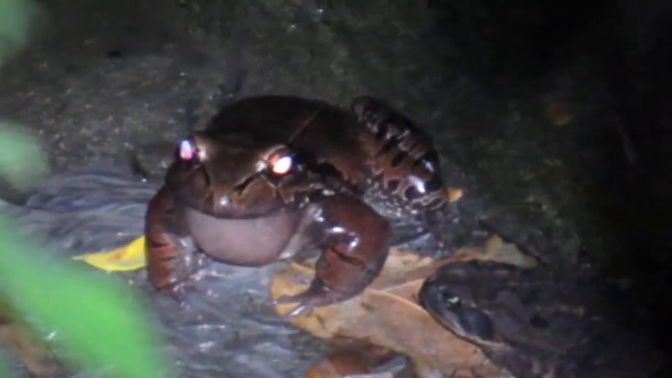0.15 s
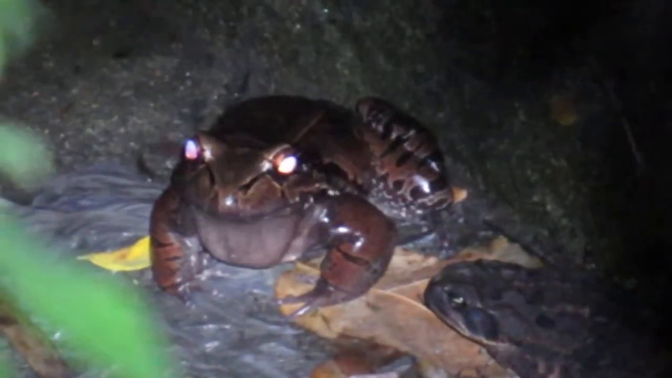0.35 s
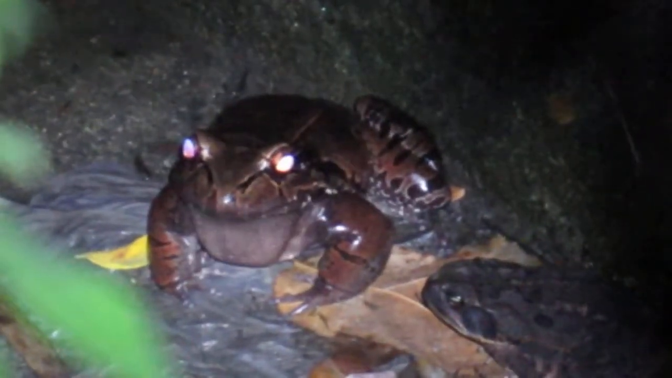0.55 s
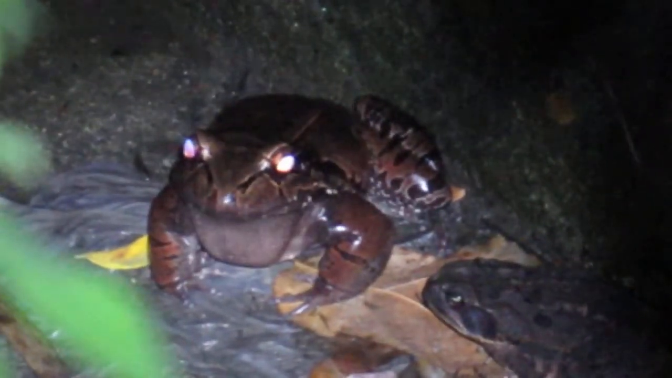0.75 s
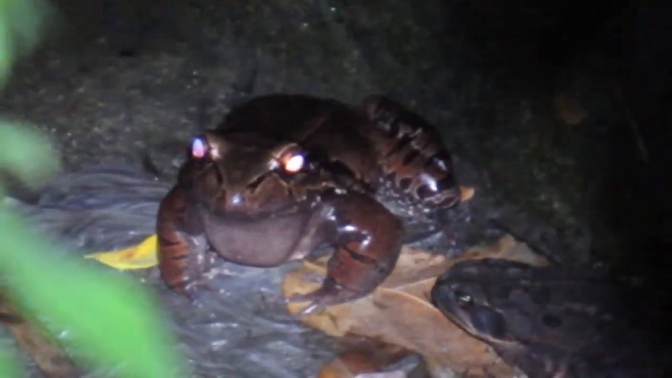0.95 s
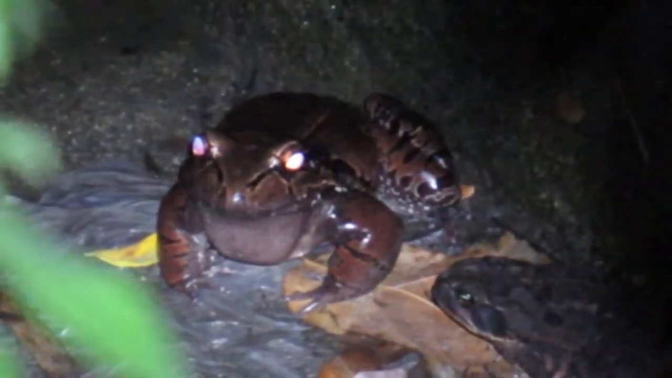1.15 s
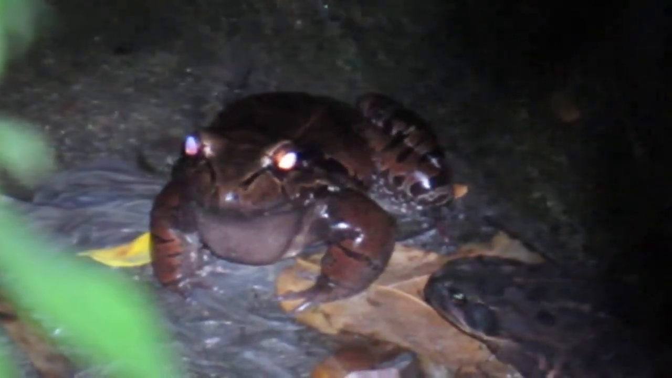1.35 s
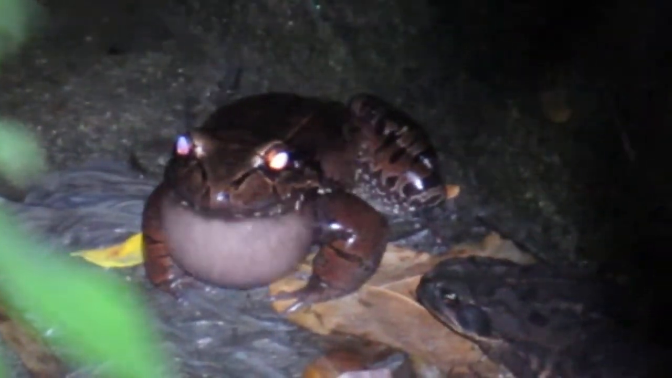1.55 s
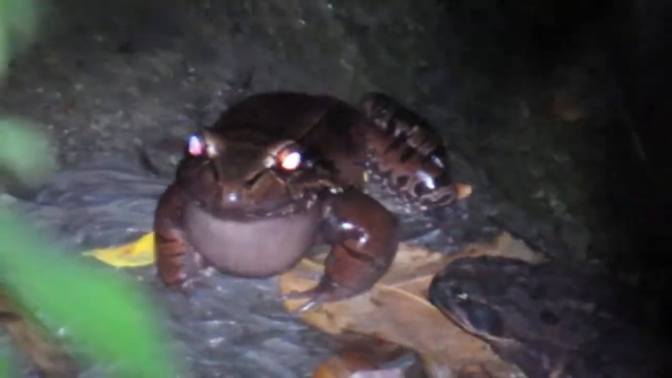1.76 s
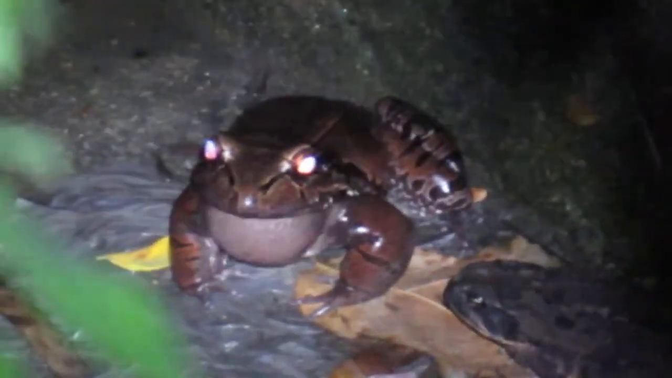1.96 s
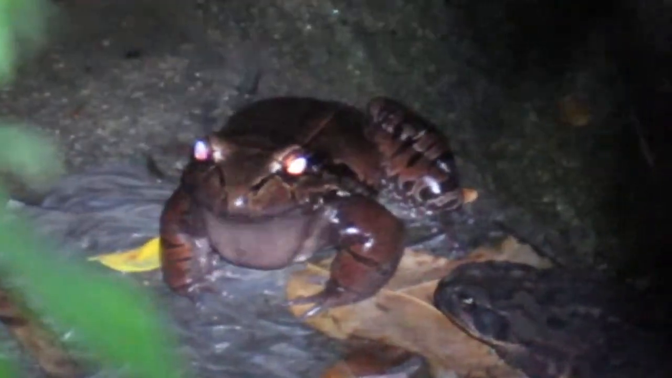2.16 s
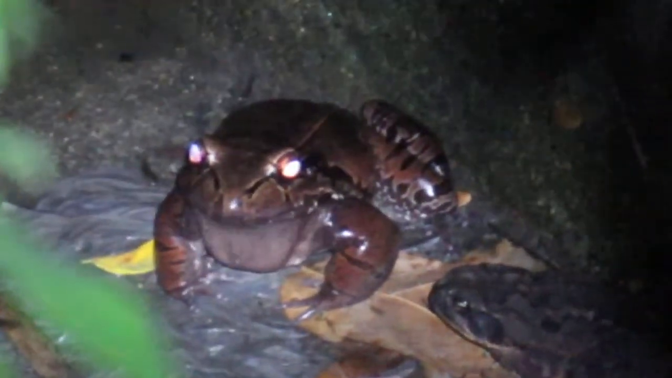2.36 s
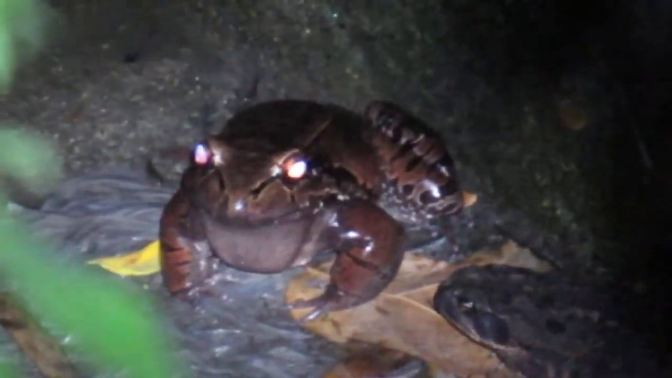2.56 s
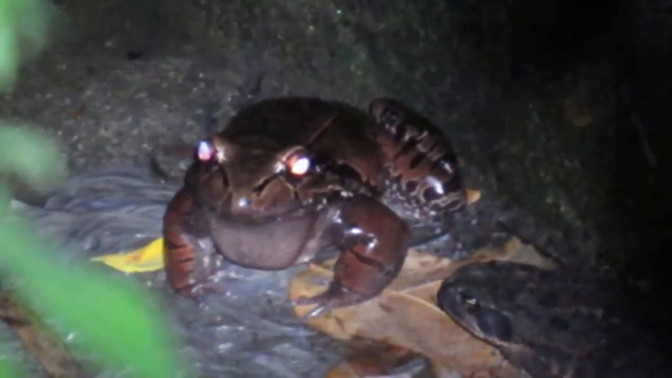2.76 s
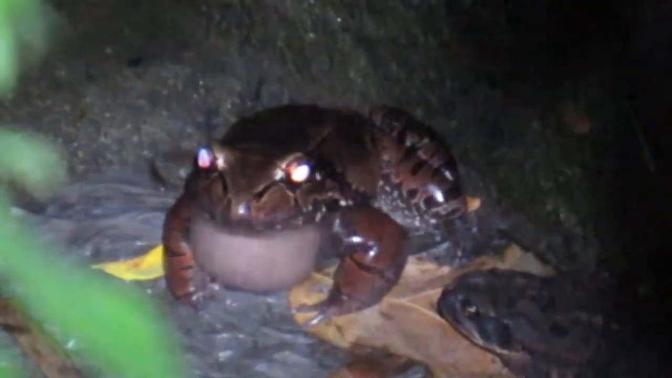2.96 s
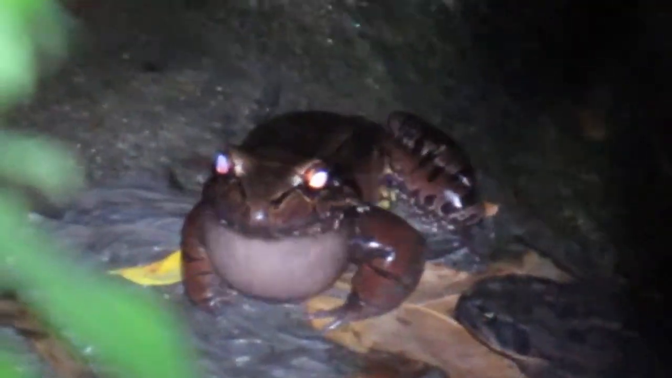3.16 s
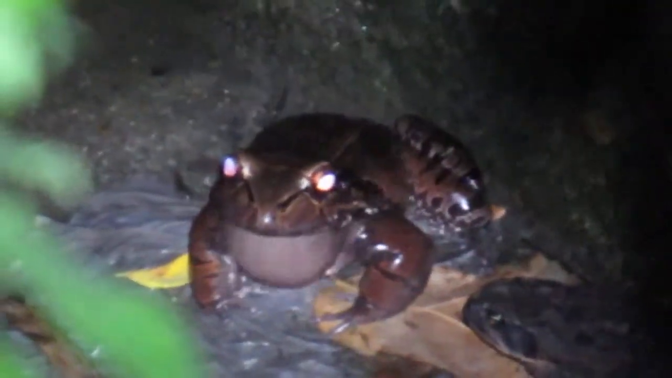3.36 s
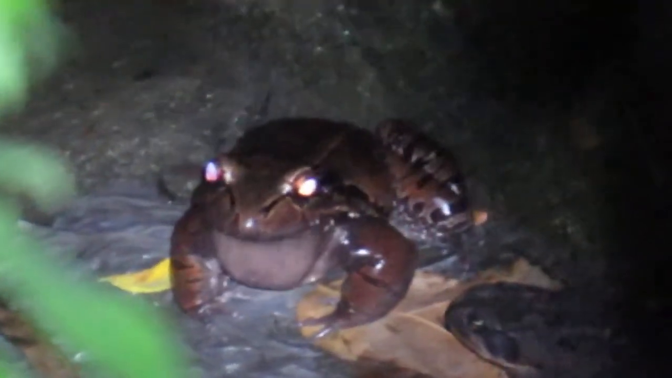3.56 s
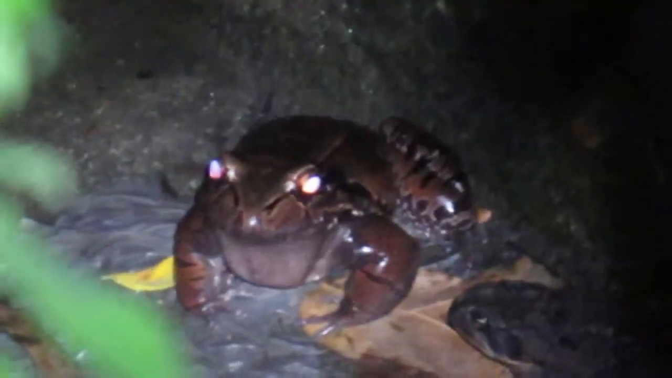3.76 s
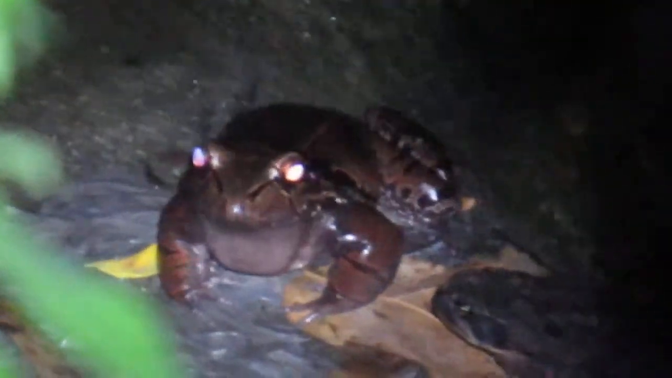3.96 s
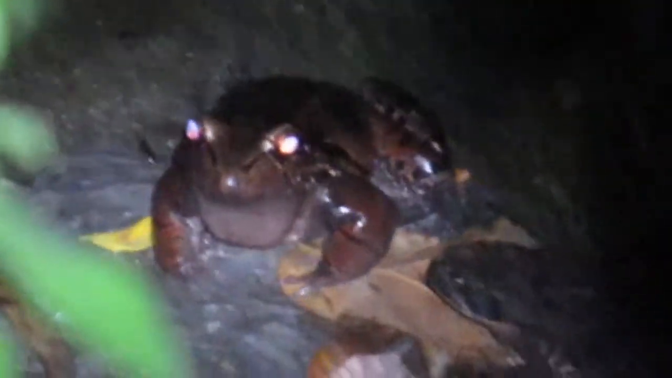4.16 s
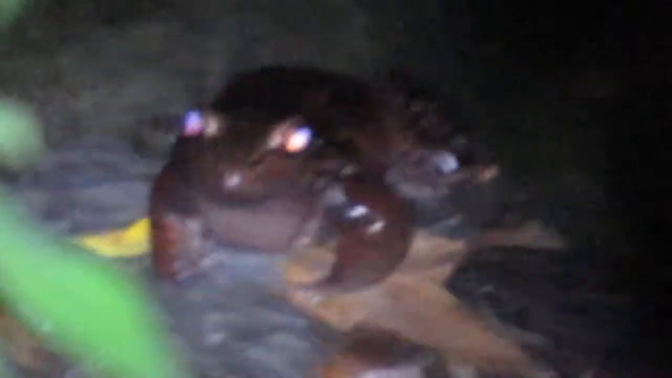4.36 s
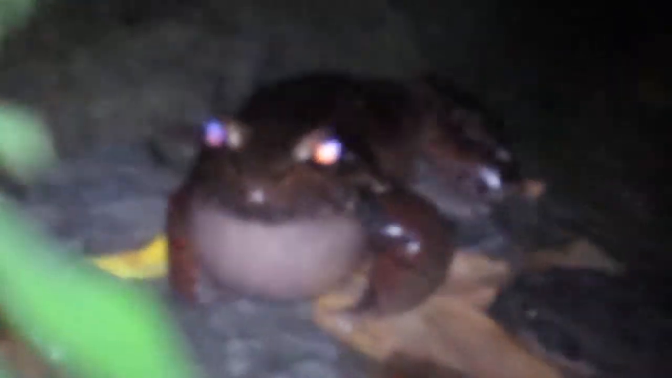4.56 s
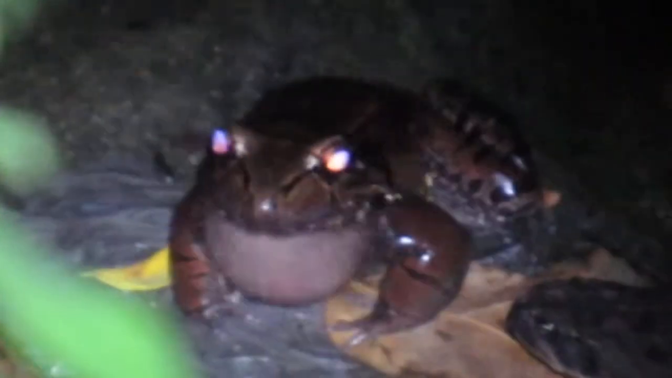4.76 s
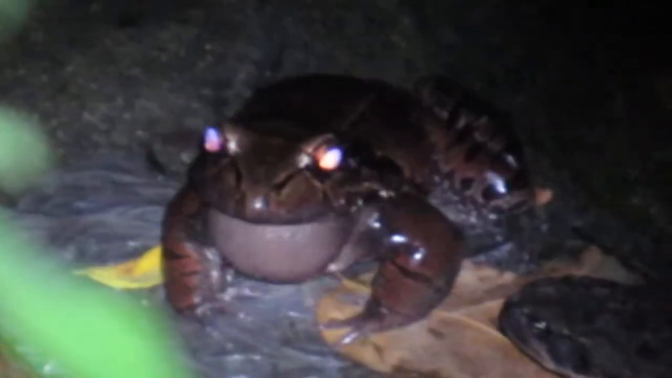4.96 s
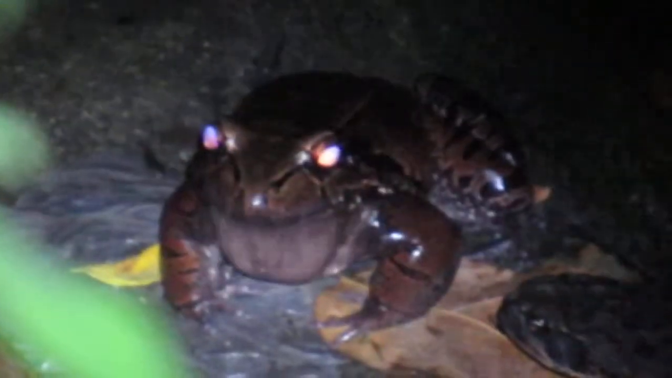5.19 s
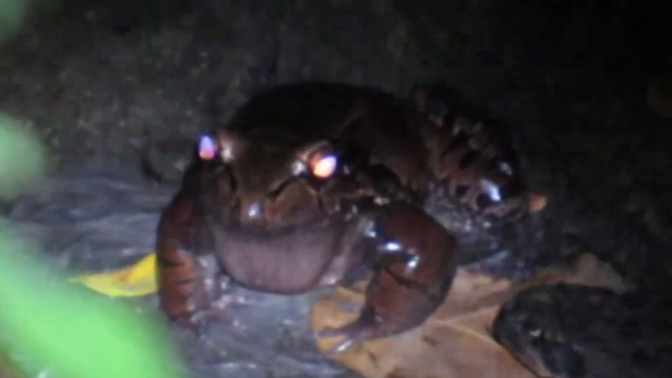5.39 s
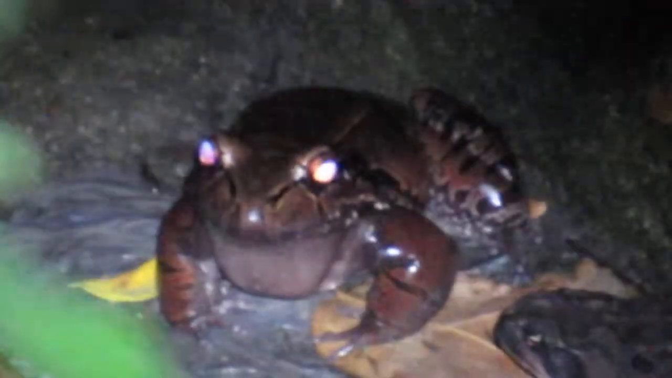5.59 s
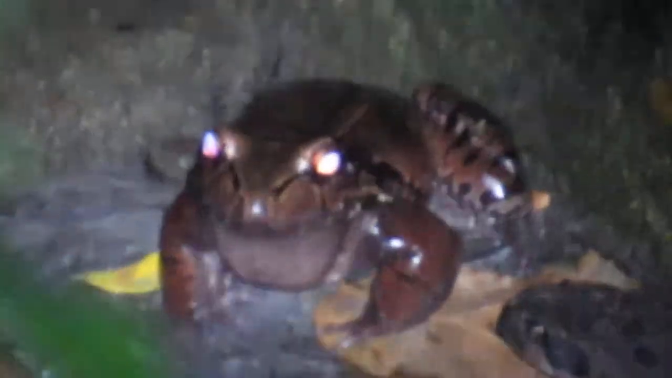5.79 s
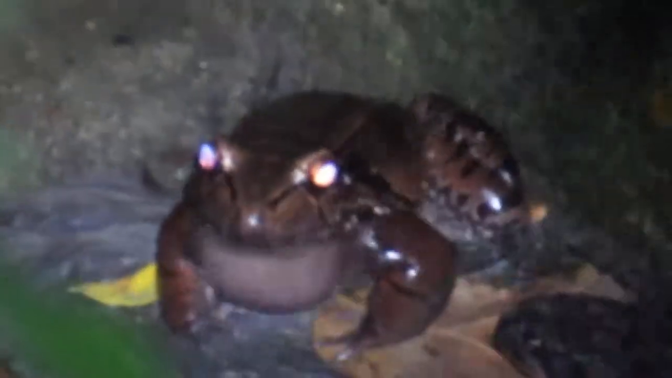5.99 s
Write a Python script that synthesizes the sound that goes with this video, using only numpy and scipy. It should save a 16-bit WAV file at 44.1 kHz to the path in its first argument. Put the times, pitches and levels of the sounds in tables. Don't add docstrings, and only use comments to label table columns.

```python
import sys
import numpy as np
from scipy import signal
from scipy.fft import rfft, irfft, next_fast_len
from scipy.io import wavfile
from scipy.ndimage import uniform_filter1d

SR = 44100
rng = np.random.default_rng(int(sys.argv[2]) if len(sys.argv) > 2 else 0)


def volts_from_decibels(level):
    exponent = np.asarray(level, float) / 20
    return 10 ** exponent


def unload_audio(sound):
    columns = np.transpose(np.atleast_2d(sound))
    steps = np.round(np.clip(columns, -1, 1) * 32767)
    wavfile.write(sys.argv[1], SR, steps.astype(np.int16))


N = 265923
T = np.arange(N) / SR
M = next_fast_len(N)
HZ = np.arange(M // 2 + 1) * SR / M

# frequency [Hz], density [dB per Hz].
NIGHT_BED = [(40, -89.5), (100, -80.5), (350, -77), (680, -79), (1000, -73), (2000, -84.5), (2900, -94.5),
             (3500, -97), (3900, -100), (5000, -106), (6000, -101), (9000, -102), (12000, -104),
             (16000, -112)]
# centre [Hz], width [Hz], level [dB], flicker rate [1/s], flicker depth [dB].
FAR_CHOIRS = [
    (1395, 307, -41.5, 45, 1.5),
    (6858, 840, -52, 25, 1.5),
    (7650, 370, -64, 62, 1.5),
    (544, 130, -44, 14, -1),
    (7310, 490, -59, 18, 0.5),
    (4216, 290, -53, 17, 2),
    (5580, 580, -66, 17, 2),
    (1532, 275, -41.5, 45, 1.5),
    (3560, 500, -67, 30, 3.5),
]
# start [s], end [s], low choir level [dB], high choir level [dB].
KATYDID_BOUTS = [
    (-.2, 0.736, 0.5, -20),
    (0.904, 1.9, -7.5, -3),
    (2.087, 2.795, -3.5, -2),
    (3.0, 3.416, -4, 7),
    (3.462, 4.22, -4, -7),
    (4.28, 4.756, -7, 1),
    (4.934, 5.696, -5, 7),
    (5.703, 6.2, -9, -9),
]
# start [s], fade [s], centre [Hz], width [Hz], level [dB].
HISSES_AND_TICKS = [
    (1.425, 0.079, 11900, 4500, -43.5),
    (3.23, 0.087, 11700, 3500, -52.5),
    (3.416, 0.0032, 2600, 2500, -37.5),
    (4.495, .008, 14000, 6000, -52.5),
    (4.6, .015, 10500, 4940, -58),
]
# chirp start [Hz], chirp end [Hz], rate [1/s], chirp length [s], first chirp [s], peak [dB].
CRICKETS = [
    (4358, 4260, 14.2, .04, .015, -43.5),
    (4547, 4420, 14.3, .03, .055, -42.5),
    (4260, 4210, 12, 0.036, .03, -44.5),
    (4190, 4100, 12, .03, .02, -52),
    (4430, 4500, 19, .03, .04, -45.5),
    (4270, 4330, 16.3, 0.028, .01, -43.5),
]
# start [s], end [s], level [dB].
TRILLS = [(.33, 0.683, -56), (1.197, 1.48, -54), (1.82, 2.047, -54.5), (2.08, 2.22, -60),
          (2.367, 2.717, -57), (2.957, 3.36, -58), (3.496, 3.867, -58), (4.07, 4.17, -53),
          (5.038, 5.423, -55), (5.74, 6.1, -54)]
# first zip [s], last zip [s], peak [dB].
ZIPS = [(0.182, .19, -56), (0.297, .31, -54), (.63, .81, -57), (1.0, 1.01, -58.5), (1.373, 1.42, -56),
        (1.543, 1.55, -60), (1.72, 1.73, -60), (1.787, 1.83, -56), (2.137, 2.35, -55), (2.577, 2.58, -56),
        (2.695, 2.7, -56), (3.027, 3.21, -55), (3.434, 3.44, -54), (3.556, 3.56, -55), (3.857, 4.04, -55),
        (4.388, 4.39, -63), (4.66, 4.81, -54.5), (5.555, 5.74, -53)]
# start [s], end [s], level [dB].
BUZZES = [
    (-.1, 0.258, -44.5),
    (1.177, 1.8, -55),
    (2.36, 3.05, -64),
    (3.725, 3.742, -45),
    (3.77, 3.808, -46),
    (3.815, 4.156, -46.5),
    (4.9, 4.893, -43),
    (4.955, 5.355, -44.5),
]
# first stroke [s], gap to the second [s], first level [dB], second level [dB].
RASPS = [
    (.827, 0.05, -66, -61.5),
    (1.106, .056, -57, -54.5),
    (2.52, 0.07, -64.5, -56),
    (2.81, 0.061, -60.5, -54),
    (4.79, 0.058, -57, -52.5),
    (5.071, .064, -53.5, -52),
    (5.925, .06, -56, -53.5),
]
# start [s], length [s], peak [dB], pitch [Hz].
PEEPS = [(.072, .08, -56, 3390), (.232, .08, -52, 3520), (0.388, .13, -54, 3560), (0.537, .13, -50, 3540),
         (.725, .08, -55, 3420), (1.19, .03, -48, 3630), (1.316, .08, -51, 3650), (1.718, .08, -53, 3470),
         (1.866, .18, -52, 3500), (2.115, .03, -51, 3780), (2.185, .03, -50, 3530), (2.308, .08, -51, 3600),
         (2.417, .08, -56, 3455), (2.596, .18, -52.5, 3590), (2.825, .08, -56, 3410),
         (2.99, .08, -55, 3420), (3.166, .08, -52, 3410), (3.533, .08, -54, 3640), (3.72, .08, -56, 3650),
         (3.865, .08, -51, 3640), (4.021, .13, -55, 3630), (4.224, .03, -55, 3360), (5.576, .03, -52, 3475),
         (5.738, .08, -53, 3530), (5.95, .03, -49, 3620)]
# whine start [s], whine level [dB], chuck delay [s], chuck level [dB].
WHINES = [
    (.28, -34, 0.39, -45),
    (2.105, -34.5, 0.39, -44),
    (3.655, -34.5, .39, -52.5),
    (5.235, -35.5, 0.38, -46.5),
]
# frequency [Hz], gain [dB].
SAC = [(200, 2), (530, 4.5), (800, -14.5), (1100, -13.5), (1500, -12.5), (1900, -27), (2300, -14),
       (2480, -17), (2680, -12.5), (2900, -33.5), (3400, -26)]
# start [s], time stretch [ratio], level [dB].
WHOOPS = [
    (1.4, 1.017, -1.1),
    (2.88, 1.023, -1),
    (4.418, 1.005, -1.6),
    (5.97, 1.02, -1.2),
]
# delay [s], level [dB].
BANKS = [
    (.047, -19.5),
    (0.13, -24),
    (0.064, -36),
]
# frequency [Hz], gain [dB].
BANK_COLOUR = [(360, -0.5), (455, -2.5), (540, -19.5)]
# frequency [Hz], phase lead [rad], level [dB], likeness [0-1].
PORTS = [(0, 3.05, -6, .998), (690, 2.6, -6.5, .995), (1460, 1.66, -4.5, .99), (2240, .85, -5, .93),
         (3450, .3, -9, .9), (4400, .33, -9.5, .95), (5600, .3, -10, .6), (7200, .05, -13, .8),
         (8600, -.7, -13, .45), (12000, -1.3, -11, .3), (16000, -1.8, -6, .1)]
# frequency [Hz], gain [dB].
MOTOR_NOTCH = [(600, 1), (1500, -3.5), (2300, -15.5), (3400, -10), (4400, -8), (5200, -7), (6900, -3),
               (8000, -1.5)]


def shape(x, points):
    hz, db = np.transpose(points)
    gain = volts_from_decibels(np.interp(np.log(HZ + 1), np.log(hz), db))
    return irfft(rfft(x, M) * gain, M)[:N]


def band(x, hz, width):
    y = irfft(rfft(x, M) / (1 + (2 * (HZ - hz) / width) ** 2) ** 1.33, M)[:N]
    return y / y.std()


def walk(rate):
    k = int(SR / rate)
    held = np.repeat(rng.standard_normal(N // k + 1), k)
    w = uniform_filter1d(uniform_filter1d(held, k), k)[:N]
    return w / w.std()


def bout(start, end, edge):
    return np.clip(np.minimum(T - start, end - T) / edge, 0, 1)


def chirps(starts, dbs, hz0, hz1, length):
    out = np.zeros(N + SR)
    n = int(length * SR)
    u = np.arange(n) / n
    for s, db, a, b in np.broadcast(starts, dbs, hz0, hz1):
        cycles = s * 977 + length * (a * u + (b - a) * u ** 2 / 2)
        out[int(s * SR):int(s * SR) + n] += volts_from_decibels(db) * np.sin(np.pi * u) ** 1.4 * np.sin(2 * np.pi * cycles)
    return out[:N]


def trees(x, t60, db):
    t = np.arange(SR // 2) / SR
    tail = rng.standard_normal(len(t)) * volts_from_decibels(-60 * t / t60) * (t > .004)
    return x + volts_from_decibels(db) * signal.fftconvolve(x, tail / np.linalg.norm(tail))[:N]


def rumble():
    low = [(20, -91.5), (60, -74.5), (130, -72), (260, -72.0), (400, -80.5), (700, -97.0), (1500, -110)]
    high = [(1500, -112), (5000, -108), (9000, -111), (12000, -111), (16000, -114)]
    side, mid = (shape(rng.standard_normal(N), low) * np.sqrt(SR / 2) for _ in range(2))
    hiss = [shape(rng.standard_normal(N), high) * np.sqrt(SR / 2) for _ in range(2)]
    whistle = volts_from_decibels(-80) * np.sin(2 * np.pi * 15734 * T)
    return np.array([side, -side]) + volts_from_decibels(-13.5) * mid + whistle + hiss


def night():
    LULL_DB, FROG_SWELL_DB = -5, 0.98
    out = shape(rng.standard_normal(N), NIGHT_BED) * np.sqrt(SR / 2) * volts_from_decibels(0.62 * walk(5.88))
    low = volts_from_decibels(LULL_DB) + sum(volts_from_decibels(db) * bout(a, b, .2) for a, b, db, _ in KATYDID_BOUTS)
    high = volts_from_decibels(LULL_DB) + sum(volts_from_decibels(db) * bout(a, b, .2) for a, b, _, db in KATYDID_BOUTS)
    swells = [volts_from_decibels(FROG_SWELL_DB * walk(3.987)), low, high] + [1] * len(FAR_CHOIRS)
    for (hz, width, db, rate, flicker_db), swell in zip(FAR_CHOIRS, swells):
        level = swell * volts_from_decibels(db + flicker_db * walk(rate))
        out = out + level * band(rng.standard_normal(N), hz, width)
    return out


def hisses_and_ticks():
    out = 0
    for s, fade, hz, width, db in HISSES_AND_TICKS:
        level = np.clip((T - s) / (0.29 * fade), 0, 1) * np.exp(-np.clip(T - s, 0, 3) / fade)
        out = out + volts_from_decibels(db) * level * band(rng.standard_normal(N), hz, width)
    return out


def zoom_motor():
    run = np.interp(T, [4.16, 4.23, 4.28, 4.32, 4.66, 4.69], [0.26, 0.87, 1.0, 0.77, 0.94, 0.095], 0, 0)
    gear = np.exp(-((62 * T + .3 * walk(30)) % 1) / 0.4) * volts_from_decibels(3 * walk(40))
    rattle = volts_from_decibels(-50) * (.5 + gear) * band(rng.standard_normal(N), 2360, 890)
    tick = volts_from_decibels(-55.5) * (0.3 + gear) * band(rng.standard_normal(N), 10600, 4000)
    return run * (rattle + tick) + chirps(4.176, -21.5, 295, 220, 0.01)


def crickets():
    out = 0
    for a, b, rate, length, first, db in CRICKETS:
        beat = first + np.arange(120) / rate
        luck = rng.standard_normal((120, 3))[beat < T[-1]].T
        beat = beat[beat < T[-1]]
        starts = np.abs(beat + .0025 * luck[0])
        out = out + chirps(starts, db + 1.2 * luck[1], a + 20 * luck[2], b + 20 * luck[2], length)
    tones = [(4808, .95), (4985, 1), (5157, .65)]  # Hz, size
    wing = sum(size * np.sin(2 * np.pi * hz * T + 1.3 * walk(35)) for hz, size in tones)
    gate = sum(volts_from_decibels(db - 4.5) * bout(a - .01, b + 0.027, 0.063) for a, b, db in TRILLS)
    return trees(out + gate * volts_from_decibels(2.6 * walk(22)) * wing, .25, -6)


def tree_crickets():
    beat = 3.118 + np.arange(15) * .0503
    db = -41 + 3 * np.tanh((beat - 3.2) / .2)
    out = sum(chirps(beat + lag, db, 6900, 6750, .011) for lag in (0, .0135))
    for a, b, zip_db in ZIPS:
        out = out + chirps(np.arange(a, b + 1e-3, .0336), zip_db, 10350, 9750, 0.019)
    return trees(out, .15, -12)


def katydids():
    STROKE_S = 0.049
    gate = sum(volts_from_decibels(db) * bout(a, b, 0.011) for a, b, db in BUZZES)
    stroke = (81.7 * T + 0.13 * walk(3.4)) % 1
    teeth = np.exp(-(3 * stroke % 1) / .3) * volts_from_decibels(-10 * stroke)
    buzz = gate * band(teeth * band(rng.standard_normal(N), 7450, 300), 7400, 800)
    grit = volts_from_decibels(4.1 * walk(160))
    first = sum(volts_from_decibels(db) * bout(s, s + STROKE_S, 0.0039) for s, gap, db, _ in RASPS)
    second = sum(volts_from_decibels(db) * bout(s + gap, s + gap + STROKE_S, 0.0052) for s, gap, _, db in RASPS)
    rasp = first * band(rng.standard_normal(N), 9600, 3300)
    rasp = grit * (rasp + second * band(rng.standard_normal(N), 9500, 4070))
    rasp = shape(rasp, [(6500, -31), (8300, 2.5), (16000, -1.5)])
    return trees(buzz, .15, -10) + trees(rasp, 0.42, -7)


def peepers():
    GAP_S = .053
    near = [(a, db, hz) for start, length, db, hz in PEEPS for a in np.arange(start, start + length, GAP_S)]
    s, db, hz = np.transpose(near)
    far = rng.random((230, 3)).T
    vary = rng.standard_normal((80, 2))[:len(s)].T
    s = np.r_[s, 6 * far[0]]
    db = np.r_[db + 1.5 + 1.5 * vary[0], -64 + 11 * far[1]]
    hz = np.r_[hz + 40 * vary[1], 3350 + 420 * far[2]]
    up = chirps(s, db, .94 * hz, 1.03 * hz, 0.0254)
    down = chirps(s + 0.016, db - 6.0, 1.03 * hz, .95 * hz, 0.0232)
    return trees(up + down, 0.2, -8.0)


def small_frog():
    PITCH_HZ, SAG_HZ_PER_S, DROP_HZ, DROP_S = 618, 490, 225, .045
    ONSET_S, ONSET_WIDTH_S, ONSET_DB, BODY_DB = 0.016, 0.022, 18, -2
    FULL_S, TIRE_DB_PER_S, FADE_S, FADE_DB_PER_S, END_S = 0.17, 32.5, 0.35, 260, .4
    out = np.zeros(N + SR)
    waver = [volts_from_decibels(-3.0 + 4.0 * walk(40)) for _ in range(5)]
    t = T[:SR // 2]
    for start, whine_db, delay, chuck_db in WHINES:
        at = slice(int(start * SR), int(start * SR) + len(t))
        hz = PITCH_HZ - SAG_HZ_PER_S * t + DROP_HZ * np.exp(-t / DROP_S)
        phase = 2 * np.pi * np.cumsum(hz) / SR
        onset_db = ONSET_DB * np.exp(-((t - ONSET_S) / ONSET_WIDTH_S) ** 2)
        fade_db = FADE_DB_PER_S * np.clip(t - FADE_S, 0, 1) + TIRE_DB_PER_S * np.abs(t - FULL_S)
        edges = np.clip(np.minimum(t, END_S - t) / 0.0057, 0, 1)
        level = volts_from_decibels(whine_db + BODY_DB + onset_db - fade_db) * edges
        taut = np.clip((t - .07) / 0.0077, 0, 1) * volts_from_decibels(-35 * np.clip(t - .1, 0, 1))
        overtones = sum(w[at] * np.sin(k * phase) for k, w in enumerate(waver, 2))
        out[at] += level * (np.sin(phase) + taut * overtones)
        c = t - delay
        phase = 2 * np.pi * np.cumsum(200 + 22 * np.exp(-np.clip(c, 0, 1) / 0.0208)) / SR
        swell_db = np.interp(c, [-0.011, 0.0027, 0.035, 0.069], [-30, -0.5, 3.0, -27], -150, -150)
        out[at] += volts_from_decibels(chuck_db + 13.5 + swell_db) * sum(np.sin(k * phase) for k in range(5, 16))
    return trees(shape(out[:N], SAC), 0.21, -6.5)


def big_frog():
    PITCH_HZ, CLIMB_HZ_PER_S, LAG_HZ, LAG_S = 398.5, 450, 115, 0.0505
    LEVEL_DB, TOP_S, ROUND_S, SWELL_DB_PER_S, FADE_DB_PER_S = -4.5, 0.14, 0.069, 211, 231
    ATTACK_S, END_S, RELEASE_S = 0.044, .234, 0.015
    PUSH_S, PUSH_DB, PUSH_HZ = .221, 2, 18
    THROB_S, THROB_GAP_S, THROB_DB, THROB_FALL_DB, THROB_HZ = .253, .038, -22.5, -6.5, 467
    out = 0
    for start, stretch, more_db in WHOOPS:
        t = np.clip((T - start) / stretch, -.02, .3)
        depth = np.exp(-np.abs(t - .035) / 0.058) * np.clip(t / 0.029, 0, 1) + .1
        turn = 2 * np.pi * 31.7 * (t - .04)
        hz = PITCH_HZ + CLIMB_HZ_PER_S * t - LAG_HZ * np.exp(-np.clip(t, 0, 1) / LAG_S)
        push = np.exp(-((t - PUSH_S) / 0.0077) ** 2) - np.exp(-((t - PUSH_S + .016) / 0.008) ** 2)
        phase = 2 * np.pi * np.cumsum(hz + PUSH_HZ * np.abs(push) + 58 * depth * np.cos(turn)) / SR
        tremble_db = 1.7 * depth * np.cos(turn + .5 - 9 * t) + PUSH_DB * push
        slope = np.where(t < TOP_S, SWELL_DB_PER_S, FADE_DB_PER_S)
        db = LEVEL_DB - slope * (np.hypot(t - TOP_S, ROUND_S) - ROUND_S)
        edges = np.clip((t + 0.021) / ATTACK_S, 0, 1) ** 2 * np.clip((END_S - t) / RELEASE_S, 0, 1)
        level = uniform_filter1d(volts_from_decibels(db - 2.5 + more_db + tremble_db) * edges, size=300)
        out = out + level * (np.sin(phase) + volts_from_decibels(-37.5) * np.sin(2 * phase))
    echoes = sum(volts_from_decibels(db) * np.interp(T - lag, T, out, 0) for lag, db in BANKS)
    k = np.arange(4)
    for start, _, more_db in WHOOPS[:-1]:
        throb_db = more_db + THROB_DB + THROB_FALL_DB * k
        out = out + chirps(start + THROB_S + THROB_GAP_S * k, throb_db, THROB_HZ, THROB_HZ, .032)
    return trees(out + shape(echoes, BANK_COLOUR), .3, -30)


def ports(x):
    columns = np.transpose(PORTS)
    hz = np.arange(N // 2 + 1) * SR / N
    turn, db, like = (np.interp(hz, columns[0], c) for c in columns[1:])
    like = np.clip(like, 0, 1)
    scramble = rng.standard_normal(2500) * np.exp(-np.arange(2500) / 700)
    other = signal.fftconvolve(x, scramble / np.linalg.norm(scramble))[:N]
    right = volts_from_decibels(db) * (like * np.exp(1j * turn) * rfft(x) + np.sqrt(1 - like ** 2) * rfft(other))
    return np.array([x, irfft(right, N)])


def scene():
    insects = crickets() + tree_crickets() + katydids()
    frogs = peepers() + small_frog() + big_frog()
    return rumble() + ports(night() + hisses_and_ticks() + zoom_motor() + insects + frogs)


def band_limit(x):
    return signal.sosfilt(signal.butter(12, 15790, fs=SR, output="sos"), x)


def record(dry):
    DUCK_S, UNDUCK_S, DUCK_DB, OVERSHOOT_DB, SETTLE_S = 4.155, 4.224, -16.5, 4, 0.038
    NOTCH_IDLE, NOTCH_FULL_S, NOTCH_LETS_GO_S, NOTCH_FADE_PER_S = 0.086, 4.33, 5.27, 0.8
    overshoot_db = OVERSHOOT_DB * (T > UNDUCK_S) * np.exp(-np.abs(T - UNDUCK_S) / SETTLE_S)
    gain_db = DUCK_DB * bout(DUCK_S, UNDUCK_S, 0.0039) + overshoot_db
    share = np.interp(T, [DUCK_S, NOTCH_FULL_S], [NOTCH_IDLE, 1])
    share = np.clip(share - NOTCH_FADE_PER_S * np.clip(T - NOTCH_LETS_GO_S, 0, 1), 0, 1)
    notched = np.array([shape(x, MOTOR_NOTCH) for x in dry])
    mix = volts_from_decibels(gain_db) * (dry + share * (notched - dry))
    return band_limit(mix)


dry = scene()
out = record(dry)
unload_audio(out)
```